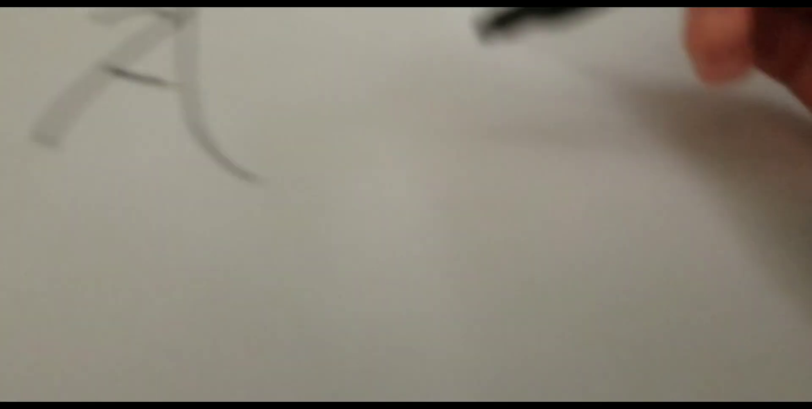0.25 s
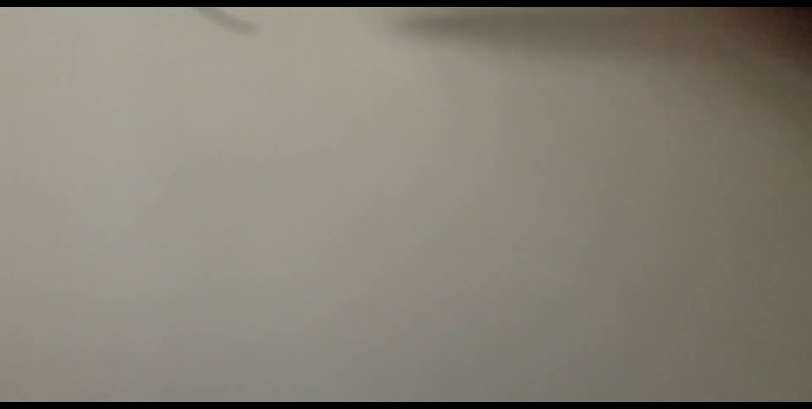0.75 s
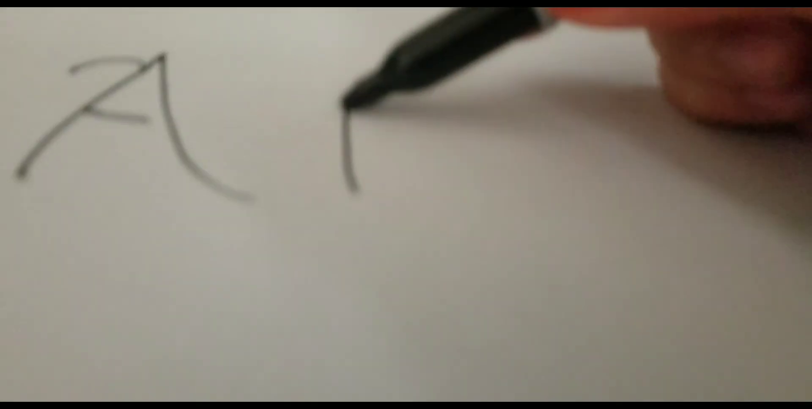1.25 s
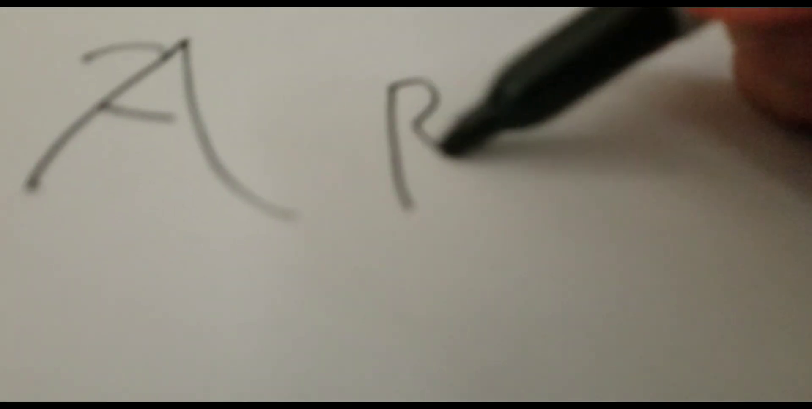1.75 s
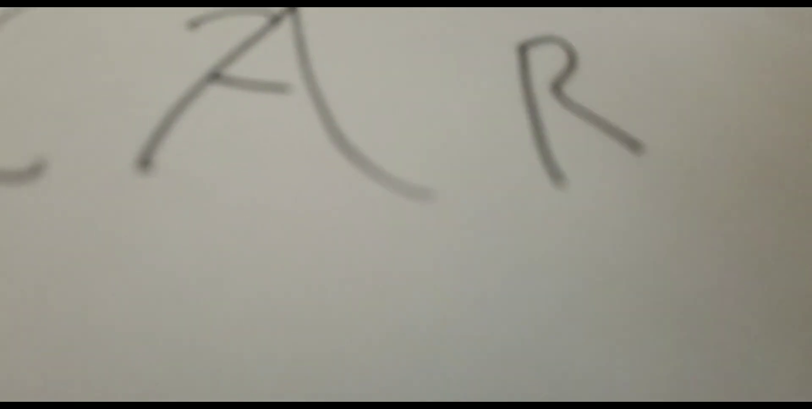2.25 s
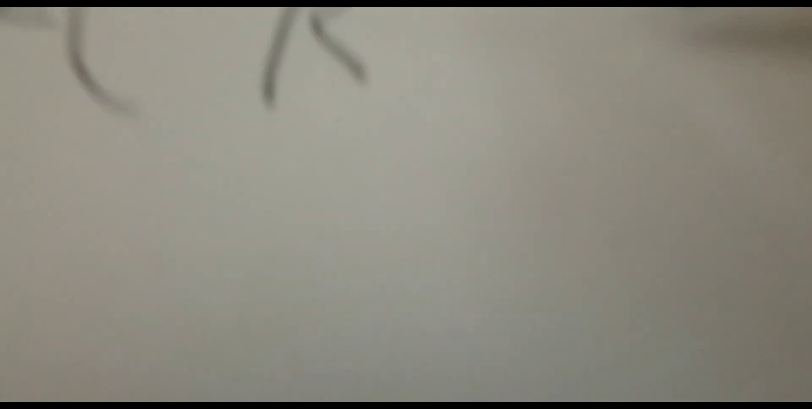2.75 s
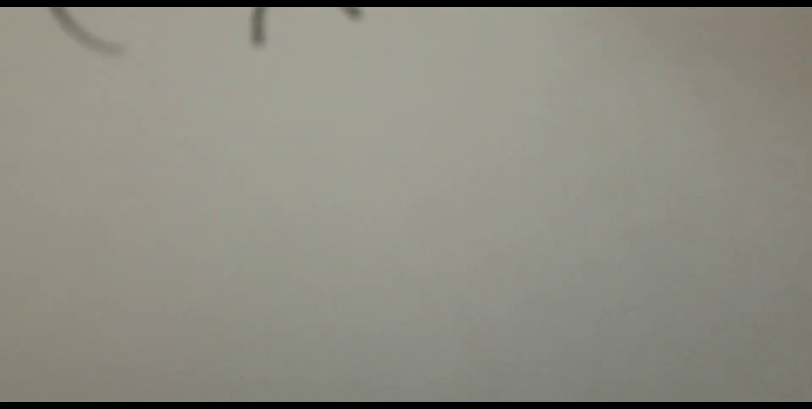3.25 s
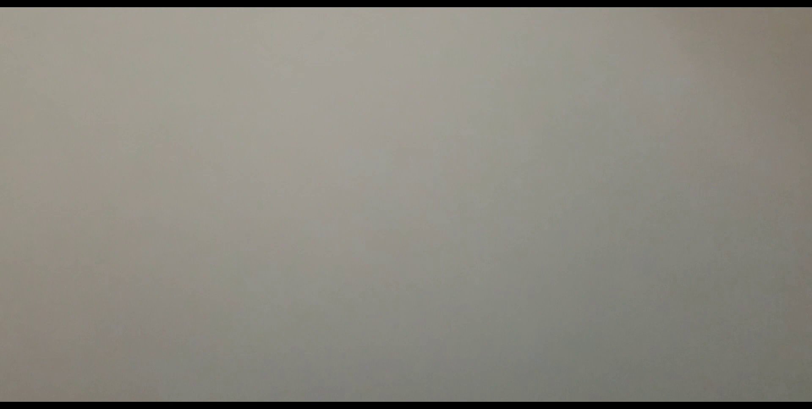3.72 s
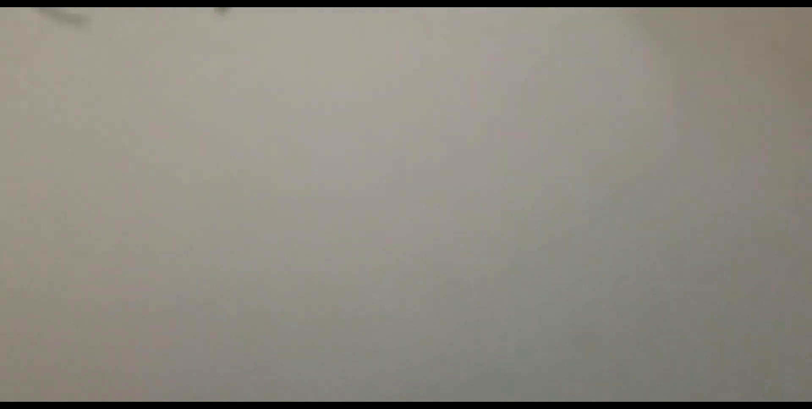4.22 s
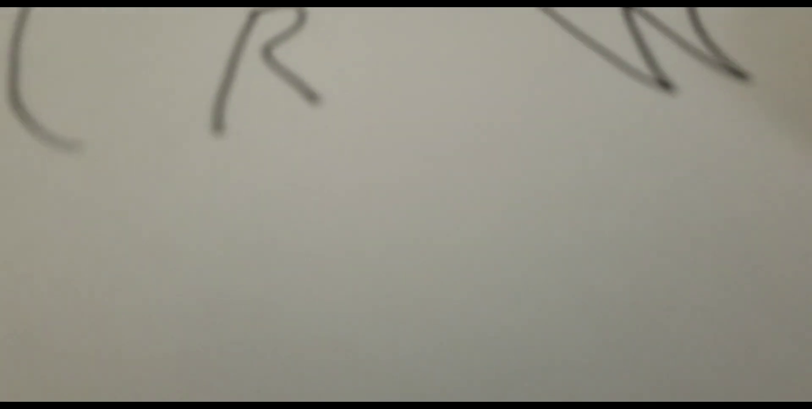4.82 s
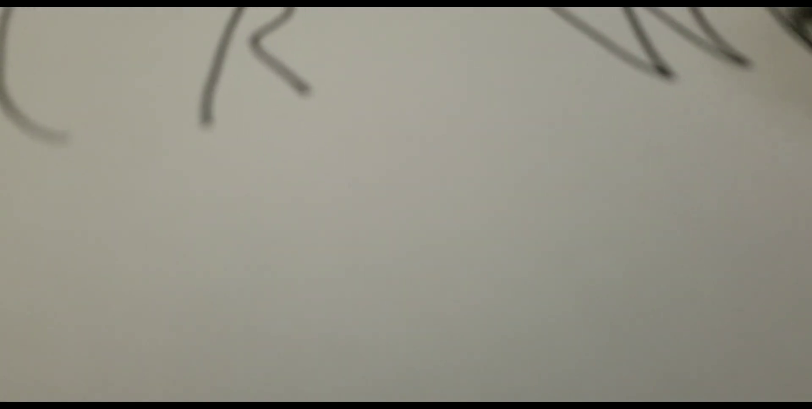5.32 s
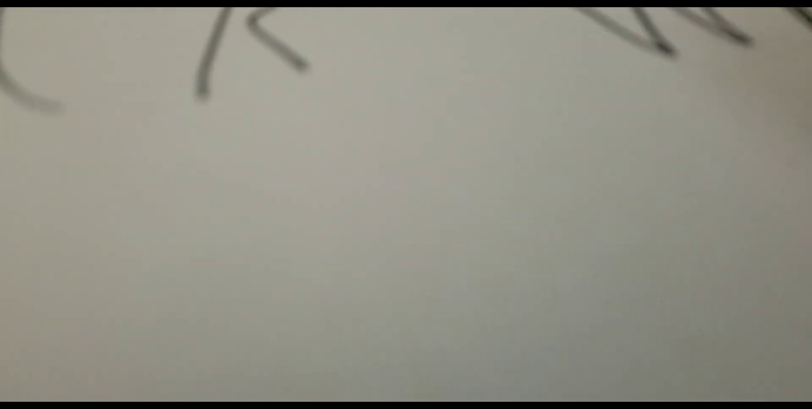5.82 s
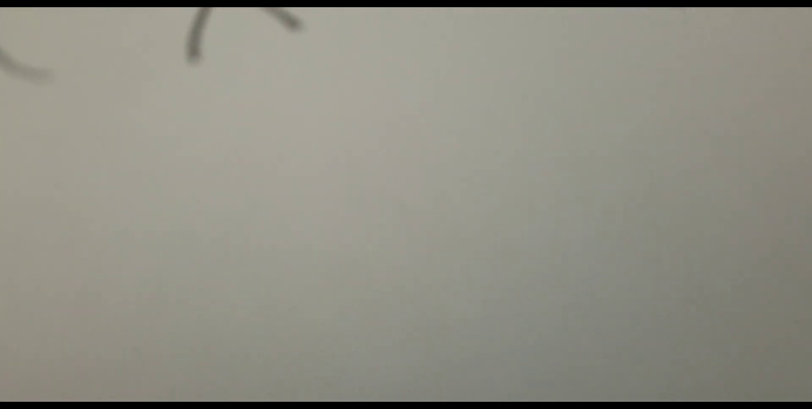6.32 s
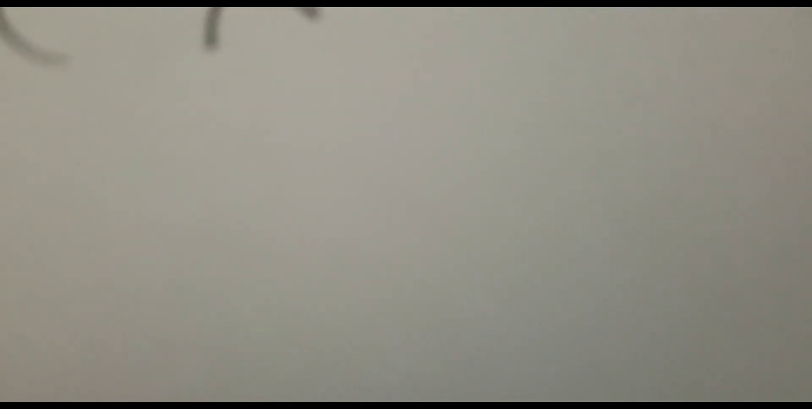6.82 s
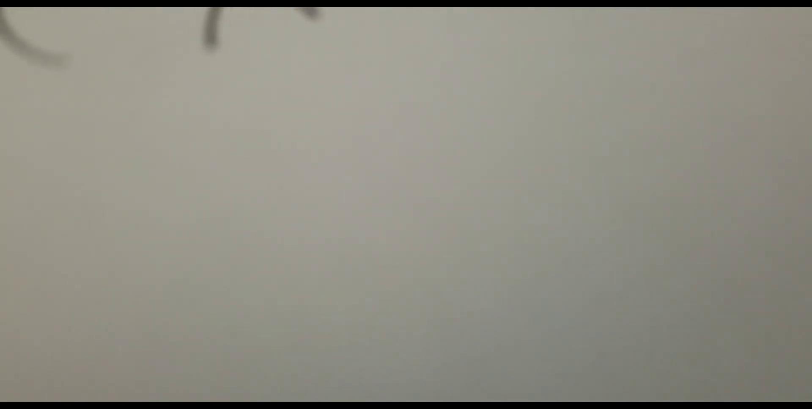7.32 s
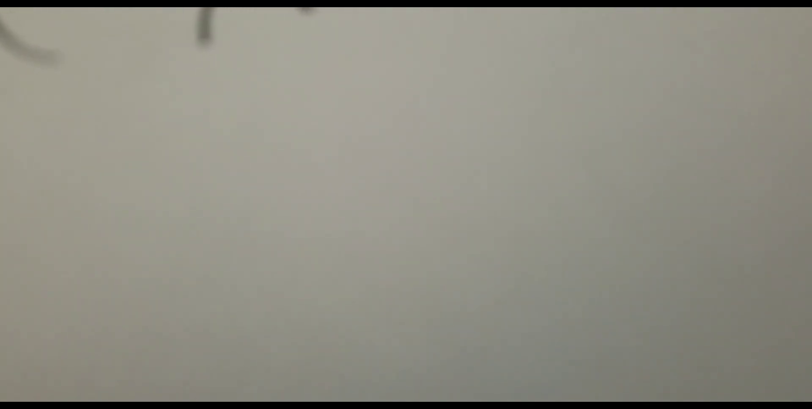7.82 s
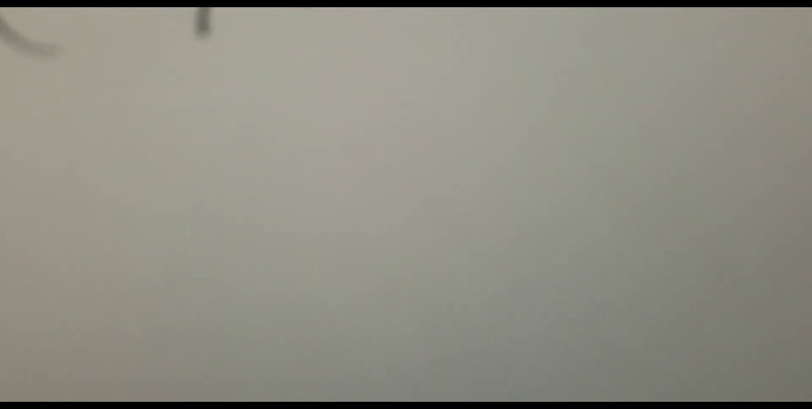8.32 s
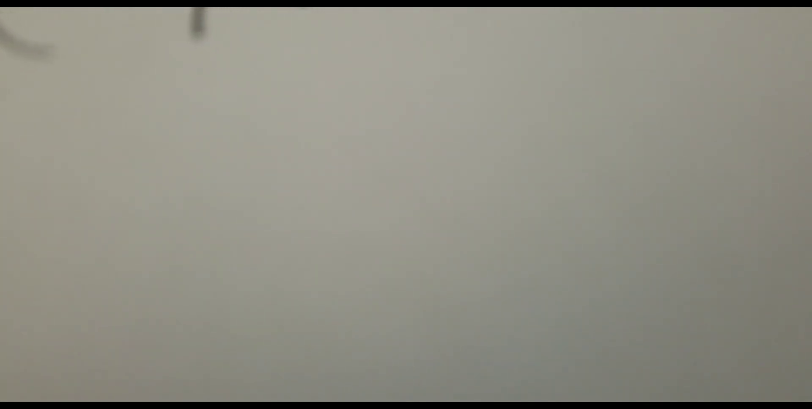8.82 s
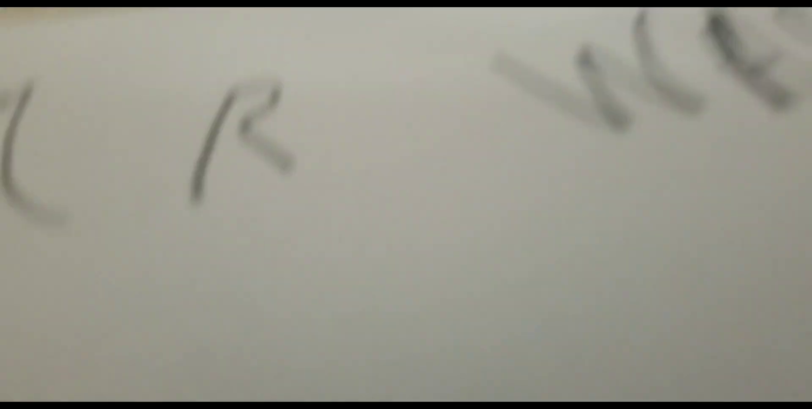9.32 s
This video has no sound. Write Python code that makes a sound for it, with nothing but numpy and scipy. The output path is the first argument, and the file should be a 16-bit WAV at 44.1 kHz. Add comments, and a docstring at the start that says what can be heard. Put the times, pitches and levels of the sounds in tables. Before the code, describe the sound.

Short dry marker scratches on paper, heard in stereo from a hand-held device near the nib. Early strokes are soft and papery; after about three and a half seconds they come in sharper clusters with gaps. Dull palm slides, a few handling clicks, small soft thuds and a final cluster of loud finger knocks accompany them over a steady, quiet motor hum in a small indoor room.

```python
"""In a small room, a felt marker writes capital letters on a sheet of paper on a countertop, near a hand-held phone.
Each stroke is a hiss of snagging fibres, made from dense random snaps whose level follows the nib's speed.
Between letters the hand slides over the sheet with a finer, duller friction.
Fingers rub, tick and bump on the phone: filtered slips, brief pressure swings and ringing blows.
An appliance adds steady sines and a low rush of filtered noise, under a thin hiss."""
import sys
import numpy as np
from scipy import signal
from scipy.fft import rfft, irfft
from scipy.io import wavfile

SR = 44100
rng = np.random.default_rng(int(sys.argv[2]) if len(sys.argv) > 2 else 0)


def int16_out(signal):
    """Quantize to a 16-bit WAV file."""
    q = np.round(np.clip(np.atleast_2d(signal).T, -1, 1) * 32767)
    wavfile.write(sys.argv[1], SR, q.astype(np.int16))


N = 421596
T = np.arange(N) / SR

# In all tables levels are relative, before trims, and pan_db is left minus right.
# marker strokes: start_s, speed_up_s, steady_s, slow_down_s, hiss_db, rasp_db, sheet_drumming_db, pan_db
MARKER_STROKES = [ (0, 0.016, 0.046, 0.094, -47, -5.5, -20, 2), (.115, .012, 0.00071, .025, -58, 1, -17, 2),
                  (1.119, 0.023, 0.1, 0.1, -46, -1, -1.5, 3), (1.31, 0.0073, 0, 0.025, -55.5, 0.5, -4, 3.5),
                  (1.524, 0.069, 0.047, 0.064, -50, -0.5, -0.5, -0.5),
                  (1.665, 0.046, .11, .05, -53, -2, 3.5, 1), (3.719, .08, 0.0016, 0.13, -40, 1, 0, -6.5),
                  (3.971, 0.025, 0.023, 0.081, -36, 1, -0.5, -0.5),
                  (4.145, 0.063, 0, 0.084, -33, -1, -4.5, -2.5),
                  (4.301, .011, 0.05, 0.08, -36, 0.5, -1.5, -3.5),
                  (4.42, 0.012, 0.0025, 0.051, -52.5, 1, -7, 1),
                  (4.998, 0.021, 0.027, 0.063, -59, -2, -20, 0),
                  (5.074, 0.079, 0.027, 0.083, -37, -.5, -1, -4),
                  (5.279, 0.016, 0.0044, .12, -31.5, 0, -1, -2),
                  (5.44, 0.097, 0.0013, 0.023, -54, 1.5, -7, 7),
                  (5.661, 0.013, 0.017, 0.023, -54, 2, 3.5, 6.5),
                  (6.156, 0.047, .088, 0.06, -41.5, -0.5, 0, -1),
                  (6.363, 0.035, 0.033, 0.078, -33, .5, 2, -2.5),
                  (6.521, 0.009, 0, 0.032, -43.5, -5, -0.5, -2),
                  (7.582, 0.027, 0.073, .02, -56, 2.5, 3, -1.5), (7.671, 0.037, 0, 0.13, -38, 2.5, 4.5, -4),
                  (7.808, 0.068, 0, 0.078, -38.5, 2.5, 6, -1.5),
                  (7.949, 0.024, 0.0024, 0.073, -43.5, 0, 3.5, -1),
                  (8.847, 0.11, 0.0044, 0.063, -34, -.5, 2.5, -2.5),
                  (9.187, .022, 0.043, 0.091, -38.5, -1.5, 4.5, -3)]
# the hand slides over the sheet: start_s, speed_up_s, slow_down_s, level_db, brightness_db
HAND_SLIDES = [ (.03, .18, 0.12, -61.5, -2.3), (0.261, 0.15, 0.19, -54.5, -4), (.6, 0.29, .2, -57, -4),
               (1.427, 0.041, .18, -60.5, -2.5), (1.8, 0.19, 0.49, -51, -6.5), (2.17, .17, 0.12, -61, -2),
               (2.43, 0.13, 0.25, -55.5, -5), (2.72, 0.11, 0.26, -51, -0.5), (2.85, 0.16, 0.58, -54, -12),
               (3.23, 0.13, 0.25, -60.5, 3.5), (4.377, 0.24, 0.12, -53.5, -7),
               (4.71, 0.035, 0.26, -57.5, -3.5), (6.7, 0.039, 0.12, -53, -8), (6.85, 0.1, 0.17, -61.5, 3.5),
               (7.98, 0.18, 0.079, -57, -4.5), (8.95, 0.027, 0.1, -58, -7), (9.02, .15, 0.07, -61.5, -7.5)]
# fingers rub the phone's case: start_s, rise_s, fall_s, level_db, pan_db
FINGER_RUBS = [(.3, 0.05, 0.04, -58.5, -2), (0.366, 0.034, 0.069, -48.5, 5), (.44, 0.024, 0.093, -58.5, 11),
               (.76, .07, 0.22, -68, 5), (2.255, 0.08, 0.13, -51.5, -4), (2.52, 0.021, 0.022, -76, 9),
               (2.6, 0.029, 0.053, -59, 22), (4.6, 0.043, 0.14, -58, 0), (5.47, .07, .04, -64, 19)]
# fingertip ticks beside the left port, plus at 9.197 s the brief crack of the nib landing: centre_s, swing_db,
# pitch_hz, length_cycles, crack_db (against the swing)
FINGER_TICKS = [(0.380, -43, 1500, 0.71, -12), (0.3892, -22.5, 2080, 1.4, -12),
                (0.3898, -39, 5040, 12, -20), (0.3906, -11.5, 705, 0.59, -14), (0.397, -24, 1910, 0.62, -2),
                (.4030, -16, 1070, 0.84, -12), (0.409, -33, 940, 0.89, -12),
                (0.4571, -20.5, 510, 0.73, -36), (2.645, -33, 1400, 0.64, 1), (2.8006, -24, 4000, 2.8, -30),
                (2.8052, -13.5, 875, 0.44, -10), (2.8201, -11, 897, 0.24, -13), (2.8245, -19, 447, 0.57, 0),
                (2.878, -13, 564, 0.44, -36), (5.500, -34, 870, 0.94, -10), (5.542, -37, 1080, 0.62, 12),
                (5.687, -27, 1620, 0.24, 5.5), (6.71, -21.5, 1410, 0.56, -8), (9.197, -29, 5950, 6, -6),
                (9.2367, -30, 874, 0.5, -14), (9.2984, -21.5, 1160, 0.54, 2.5),
                (9.3503, -18, 982, 0.5, -15), (9.3822, 2, 880, 0.31, -31), (9.3844, -12.5, 177, 0.35, -31),
                (9.4311, -1.5, 930, 0.34, 0), (9.4328, -29, 855, 2.3, -26), (9.4430, -27, 850, 1.5, -36),
                (9.548, -32.5, 1020, 1.1, -7)]
# soft bumps through the counter and the case: start_s, level_db, pitch_hz
SOFT_BUMPS = [(3.636, -38.5, 342), (4.62, -32, 73), (5.682, -33.5, 71.5), (6.127, -37, 290),
              (6.708, -23.5, 373), (7.041, -27, 76), (7.064, -29.5, 99), (8.192, -30.5, 73),
              (9.196, -28, 328), (9.265, -29.5, 74), (9.546, -32, 332)]
# modes that a bump rings: pitch_hz (varied a little per bump), t60_s, level_db
BUMP_MODES = [(98.5, 0.32, -61), (156, 0.59, -35), (238.3, 0.17, -15.5), (345, 0.08, -7),
              (454, 0.14, -18.5), (883, 0.064, -13)]

# noise spectra: frequency_hz, density_db (per Hz)
NIB_SPECTRUM = [(3000, -72), (6000, -26), (8300, -16.5), (9800, -6), (11300, -5.5), (12700, -1),
                (14000, -1.5), (15300, -3), (16500, -4)]
RASP_SPECTRUM = [(1500, -33), (2400, -6.5), (3000, -3.5), (3800, -5.5), (4800, -2), (6300, 0), (7500, -5.5),
                 (9000, -12.5), (14000, -40)]
SHEET_SPECTRUM = [(200, 1.5), (600, -1), (1000, 4.5), (1500, 3.5), (2000, 1), (2600, -16), (3600, -25),
                  (7000, -26)]
SLIDE_SPECTRUM = [(500, -3.5), (1200, -5), (2000, -1), (3200, -3), (4500, -2.5), (6500, -4.5), (8500, -12),
                  (12000, -19)]
SCRAPE_SPECTRUM = [(250, 5), (600, 7.5), (900, -32), (1400, 3.5), (2200, -1.5), (4000, -18.5), (8000, -46)]  # a finger on the case
RUSH_SPECTRUM = [(25, -37), (45, 11), (70, 11.5), (95, 6.5), (160, -2.5), (215, -5.5), (260, -6),
                 (330, 7.5), (430, 3.5), (640, -4.5), (930, -7), (1250, -36), (2500, -40), (8000, -84)]
THIN_HISS_SPECTRUM = [(900, 16.5), (1400, 6), (1900, 6.5), (2600, 0.5), (3600, -6), (4400, 1.5), (6500, 3),
                      (7600, -4), (8600, -17), (10500, -5), (12500, -2.5), (15500, 3.5)]

# steady tones of the appliance above its hum: pitch_hz, level_db, pan_db
APPLIANCE_WHINES = [(121.9, -62.5, 7), (213, -68, -3), (316.6, -58.5, -0.5), (469, -59, 24), (522, -67, 6)]
# air modes that the appliance excites: pitch_hz, width_hz (doubled in each filter pass), level_db, pan_db
AIR_MODES = [(128, 15.5, -59.5, 9), (215.7, 18.4, -60, 5), (316.5, 16, -55.5, 2), (356, 46, -58.5, -4),
             (512.3, 32, -60.5, 7)]
# level of the thin hiss over time: time_s, level_db
THIN_HISS_LEVEL = [(0, -56.5), (2.5, -58.5), (5.3, -58), (5.8, -60.5), (7.4, -57), (8.5, -62), (9.4, -52)]
# the left port hears little bass until the grip shifts: time_s, share_lost (0 to 1)
LEFT_BASS_LOSS_CURVE = [(5.43, 1), (5.49, 0)]

HUM_HZ, HUM_DB = 58.8, -46.5
TOP_HZ = 15650  # upper limit of the phone's sound
SPEED_POWER = 2.85  # the nib's friction grows as this power of its speed
USUAL_DB = -38  # hiss_db of an ordinary stroke
RASP_GROWTH, SHEET_GROWTH = 0.69, 0.43  # dB gained per dB of hiss: slow strokes sound duller
BITE_S, QUICK_START_S = 0.015, 0.021  # decay of the bite, and the start time that gives it in full
PORT_LAG_S = 0.00028  # the shared part of the nib's sound reaches the left port this much later
SNAG_RATE, SNAG_DB = 110, -18  # coarse snaps per second, and their level against the fine ones


def marker(hiss_db=-37, rasp_db=-45.0, sheet_db=-51.0, judder_db=-0.5, press_db=1.7,
           rasp_pan_db=2.5, sheet_pan_db=4.5, shared=0.46):
    """The nib snags fibres: they hiss, rasp and shake the sheet, each growing with the nib's speed."""
    own = fibres(rate=12000, spread_db=2.5)
    # now and then a coarse fibre snaps
    own = own + undb(SNAG_DB) * fibres(rate=SNAG_RATE, spread_db=4)
    left = own[0] + shared * np.roll(own[1], int(PORT_LAG_S * SR))
    right = np.hypot(1, shared) * own[1]
    snaps = near_echoes(np.array([left, right]))

    hiss = undb(hiss_db) * colour(snaps, NIB_SPECTRUM)
    rasp = undb(rasp_db) * colour(snaps, RASP_SPECTRUM) * pan(rasp_pan_db)[:, None]
    sheet = undb(sheet_db) * colour(snaps, SHEET_SPECTRUM) * pan(sheet_pan_db)[:, None]
    out = np.zeros((2, N))
    for start, rise, hold, fall, db, grit_db, drum_db, pan_db in MARKER_STROKES:
        span, force = friction(start, rise, hold, fall, SPEED_POWER)
        force = force * undb(db - USUAL_DB)
        # a nib that starts quickly bites into the paper: extra hiss that dies away
        bite_amount = QUICK_START_S / max(rise, QUICK_START_S)
        bite = 1 + bite_amount * np.exp(-(T[span] - start) / BITE_S)
        stroke = hiss[:, span] * force * bite
        stroke += rasp[:, span] * force ** RASP_GROWTH * undb(grit_db)
        stroke += sheet[:, span] * force ** SHEET_GROWTH * undb(drum_db)
        out[:, span] += pan(pan_db)[:, None] * stroke
    # the nib judders quickly while the pressure on it wanders
    return out * undb(judder_db * walk(300) + press_db * walk(70))


def hand(level_db=-0.47, bright_db=1, pan_db=2.5, power=1.47, hiss_growth=1.2):
    """Skin slides over the paper: a finer, duller friction than the nib's, brightest at full speed."""
    snaps = fibres(rate=23000, spread_db=2.0)
    rub = colour(snaps, SLIDE_SPECTRUM)
    hiss = colour(snaps, NIB_SPECTRUM)
    out = np.zeros((2, N))
    for start, rise, fall, db, hiss_db in HAND_SLIDES:
        span, force = friction(start, rise, 0, fall, power)
        bright = undb(bright_db + hiss_db) * force ** hiss_growth * hiss[:, span]
        out[:, span] += undb(db) * (force * rub[:, span] + bright)
    return out * undb(level_db + 1.1 * walk(54)) * pan(pan_db)[:, None]


def grip(level_db=7.5, scrape_db=-3, power=2.1):
    """Fingers creep on the case in small slips: a dull scrape, and the ring of the case's hollow."""
    slips = fibres(rate=3500, spread_db=3)
    hollow = unit(resonate(resonate(slips, 930, 260), 930, 260))
    scrape = undb(scrape_db) * colour(slips, SCRAPE_SPECTRUM)
    # the scrape leans left, the hollow slightly right
    sound = hollow * pan(-0.5)[:, None] + scrape * pan(3.8)[:, None]
    out = np.zeros((2, N))
    for start, rise, fall, db, pan_db in FINGER_RUBS:
        span, force = friction(start, rise, 0, fall, power)
        out[:, span] += undb(level_db + db) * force * sound[:, span] * pan(pan_db)[:, None]
    return out


def ticks(level_db=-0.5, crack_hz=3400, crack_s=0.0001, right_db=-23, soft_hz=6500):
    """A fingertip sticks and lets go at the left port, and once the nib lands with a crack: a brief swing of
    pressure with a crack in it."""
    out = np.zeros((2, N))
    t = np.arange(-SR // 100, SR // 100) / SR
    for s, db, hz, cycles, sharp_db in FINGER_TICKS:
        swing = -np.sin(2 * np.pi * hz * t) / np.cosh(2 * t * hz / cycles)
        crack = np.cos(2 * np.pi * crack_hz * t) * np.exp(-(t / crack_s) ** 2)
        tick = swing + undb(sharp_db) * crack
        # the right port barely hears it
        add(out, s + t[0], undb(level_db + db) * np.outer([1, undb(right_db)], tick))
    return dull(out, soft_hz)


def bumps(level_db=19, ring_db=-11, scuff_db=-5, scuff_ratio=1.65, scuff_t60=0.054):
    """Soft blows reach both ports; a louder one scuffs more, a lower one rings the high modes less."""
    out = np.zeros((2, N))
    t = np.arange(SR // 3) / SR
    loudest_db = max(db for _, db, _ in SOFT_BUMPS)
    for s, db, hz in SOFT_BUMPS:
        ring = np.zeros(len(t))
        for mode_hz, t60, mode_db in BUMP_MODES:
            tone = np.sin(2 * np.pi * mode_hz * rng.normal(1, 0.033) * t)
            ring += undb(mode_db - 60 * t / t60) * tone / (1 + (mode_hz / hz / 2) ** 2)
        scuff_hz = scuff_ratio * hz
        scuff = rng.standard_normal(len(t)) * undb(-60 * t / scuff_t60)
        scuff = resonate(scuff, scuff_hz, scuff_hz)
        scuff = dull(scuff / np.linalg.norm(scuff), 2 * scuff_hz)
        thud = blow(hz, damping=1.14)
        thud = thud + undb(scuff_db + db - loudest_db) * scuff + undb(ring_db) * ring
        add(out, s, undb(level_db + db) * np.outer([1, 1], thud))
    return out


def appliance(rush_db=-53.0, hiss_pan_db=6, hum_pan_db=2.5, drift_rad=0.82):
    """A motor's steady hum and whines, and a low rush that fills the room's modes; a thin hiss lies above."""
    hum = np.sqrt(2) * np.sin(2 * np.pi * HUM_HZ * T) * undb(HUM_DB) * pan(hum_pan_db)[:, None]
    for hz, db, pan_db in APPLIANCE_WHINES:
        # the whines drift a little in phase
        whine = np.sqrt(2) * np.sin(2 * np.pi * hz * T + drift_rad * walk(9))
        hum = hum + whine * undb(db) * pan(pan_db)[:, None]
    rush = undb(rush_db) * colour(air(0.31), RUSH_SPECTRUM)
    for hz, width, db, pan_db in AIR_MODES:
        mode = unit(resonate(resonate(air(0.91), hz, 2 * width), hz, 2 * width))
        rush = rush + undb(db) * mode * pan(pan_db)[:, None]
    hiss_level = undb(np.interp(T, *np.transpose(THIN_HISS_LEVEL)))
    hiss = hiss_level * colour(air(0.024), THIN_HISS_SPECTRUM) * pan(hiss_pan_db)[:, None]
    return hum + rush + hiss


def room(x, wet_db=-19, t60=0.4):
    """A short, faint tail from the walls: exponentially decaying noise, separate for each port."""
    t = np.arange(SR // 2) / SR
    tail = rng.standard_normal((2, len(t))) * undb(-60 * t / t60) * (t > 0.004)
    tail /= np.linalg.norm(tail, axis=1, keepdims=True)
    return x + undb(wet_db) * signal.fftconvolve(x, tail, axes=1)[:, :N]


def near_echoes(snaps, bounce=0.54):
    """Short echoes off the hand and the counter comb the sound differently on every stroke."""
    heard = snaps.copy()
    for start, rise, hold, fall, *_ in MARKER_STROKES:
        span = np.flatnonzero((T >= start) & (T <= start + rise + hold + fall))
        for port in range(2):
            for lag_s in rng.uniform(0.0003, 0.0016, size=3):
                # the path changes a little as the nib travels
                path = lag_s * SR * (1 + rng.normal(0, 0.28) * (T[span] - start))
                heard[port, span] += bounce * snaps[port, span - np.rint(path).astype(int)]
    return heard


def friction(start, rise, hold, fall, power):
    """One movement eases up to speed, holds and eases to rest; friction is a power of its speed."""
    end = start + rise + hold + fall
    span = np.arange(*np.searchsorted(T, [start, end]))
    speeding_up = (T[span] - start) / max(rise, 1 / SR)
    slowing_down = (end - T[span]) / max(fall, 1 / SR)
    ramp = np.minimum(speeding_up, slowing_down)
    speed = np.sin(np.pi / 2 * np.clip(ramp, 0, 1))
    return span, speed ** power


def fibres(rate, spread_db):
    """Dense tiny snaps of uneven size, at random moments shared by the two ports; rms 1."""
    snaps = rng.random(N) < rate / SR
    sizes = undb(spread_db * rng.standard_normal(N))
    return unit(snaps * sizes * rng.standard_normal((2, N)))


def blow(hz, damping):
    """A short, heavily damped push and rebound; unit energy."""
    push = signal.unit_impulse(SR // 3)
    push = resonate(resonate(push, hz, hz * damping), hz, hz * damping)
    push = signal.sosfilt(signal.butter(2, min(3 * hz, SR / 3), fs=SR, output="sos"), push)
    return push / np.linalg.norm(push)


def dull(x, hz):
    """Soft contact: take away the treble."""
    return signal.sosfilt(signal.butter(4, min(hz, SR / 3), fs=SR, output="sos"), x)


def colour(x, points):
    """Filter by a spectrum of frequency and dB points; rms 1."""
    hz, db = np.transpose(points)
    f = np.maximum(np.fft.rfftfreq(N, 1 / SR), 1)
    gain = undb(np.interp(np.log(f), np.log(hz), db))
    return unit(irfft(rfft(x) * gain, N))


def resonate(x, hz, width_hz):
    """Two-pole resonance, gain 1 at the centre."""
    return signal.lfilter(*signal.iirpeak(hz, hz / min(width_hz, SR / 4), SR), x)


def walk(rate):
    """Random wander: straight lines between random levels, at this many levels per second."""
    knots = rng.standard_normal(4096)
    return np.interp(T * rate, np.arange(len(knots)), knots)


def air(likeness):
    """Two noises that share a part, from 0 (unrelated) to 1 (identical)."""
    share = np.clip(likeness, 0, 1)
    common = np.sqrt(share) * rng.standard_normal(N)
    return common + np.sqrt(1 - share) * rng.standard_normal((2, N))


def pan(db):
    """Left and right gains for a level difference, at constant power."""
    gains = undb(np.array([db, -db]) / 2)
    return gains / np.sqrt(np.mean(gains ** 2, axis=0))


def add(out, s, sound):
    """Mix a sound in at a time in seconds."""
    start = max(int(s * SR), 0)
    out[:, start:start + sound.shape[1]] += sound[:, :N - start]


def undb(db):
    """Decibels to gain."""
    return 10 ** (np.asarray(db) / 20)


def unit(x):
    """Scale to rms 1."""
    return x / np.sqrt(np.mean(x ** 2))


def scene():
    """Writing in the room, handling noise on the phone, and the appliance with the thin hiss."""
    return room(marker() + hand()) + grip() + ticks() + bumps() + appliance()


def record(dry, bass_hz=260, leak_db=-17):
    """The left port hears little bass until the grip shifts; the phone cuts the top."""
    f = np.fft.rfftfreq(N, 1 / SR)
    slope = (f / bass_hz) ** 4
    passed = np.sqrt((undb(2 * leak_db) + slope) / (1 + slope))
    thin = irfft(rfft(dry[0]) * passed, N)
    loss = np.clip(np.interp(T, *np.transpose(LEFT_BASS_LOSS_CURVE)), 0, 1)
    ports = np.array([dry[0] + loss * (thin - dry[0]), dry[1]])
    return signal.sosfilt(signal.ellip(10, 0.2, 70, TOP_HZ, fs=SR, output="sos"), ports)


dry = scene()
out = record(dry)
int16_out(out)
```